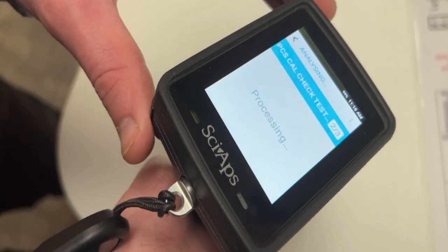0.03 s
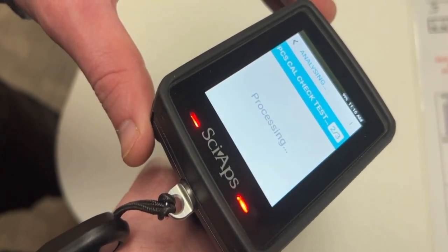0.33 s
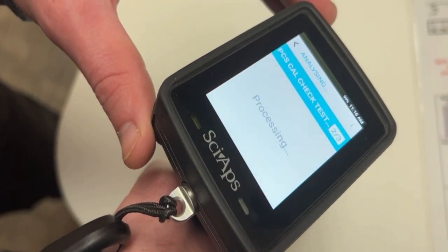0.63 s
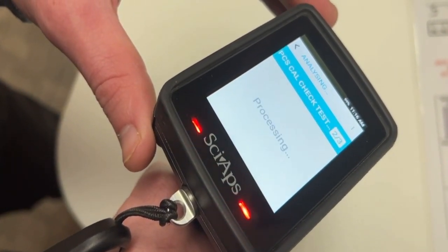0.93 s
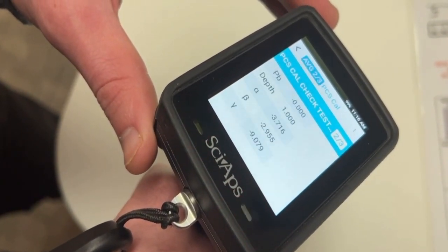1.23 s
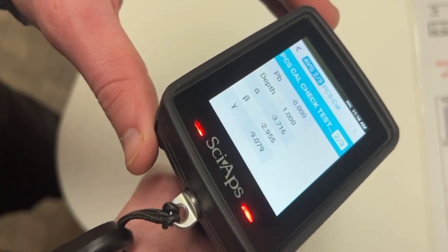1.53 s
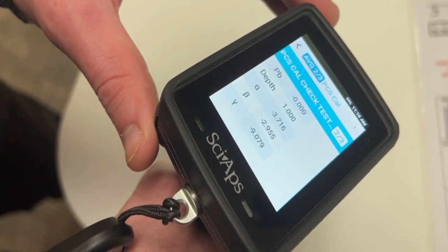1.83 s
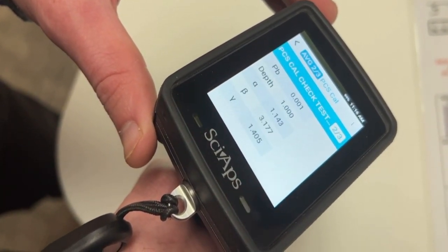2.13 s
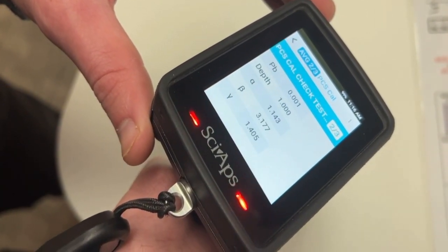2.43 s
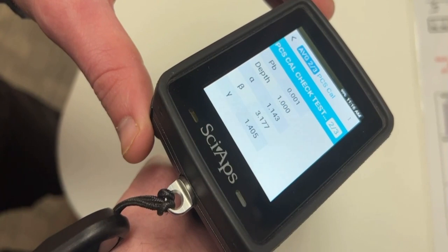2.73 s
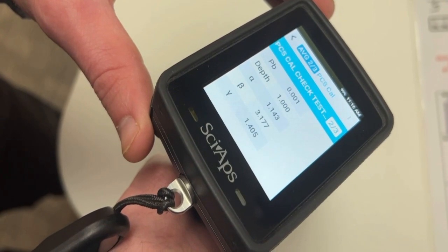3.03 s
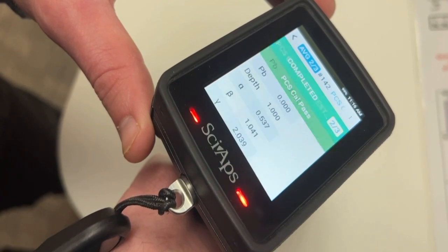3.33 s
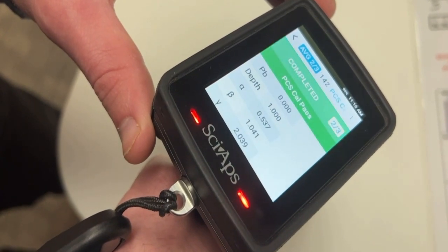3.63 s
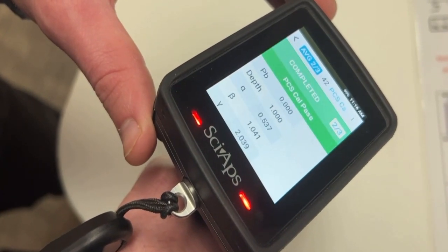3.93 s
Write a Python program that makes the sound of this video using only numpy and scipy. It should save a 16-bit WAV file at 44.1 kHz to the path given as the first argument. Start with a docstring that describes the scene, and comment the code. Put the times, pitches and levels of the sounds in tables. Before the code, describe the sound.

A handheld device's little motor gives a short, whining buzz as a latch snaps, rests with two faint ticks, then buzzes again with clicking gears and a tiny break. A low indoor hum and ventilation continue underneath.

```python
"""A click and an abrupt whirr: a small stepper motor in a handheld analyzer runs, and a latch snaps.
Two soft ticks follow, then a second burst with a brief stop in it.
The motor's steps whine; its gears rattle the plastic case and click as they take up slack.
A low hum and ventilation fill the room throughout."""
import sys
import numpy as np
from scipy import signal
from scipy.fft import rfft, irfft
from scipy.io import wavfile

SR = 44100
rng = np.random.default_rng(int(sys.argv[2]) if len(sys.argv) > 2 else 0)


def wav_out(sig):
    """Save sig, one row per channel (or a flat mono array), as 16-bit PCM at SR to the path in sys.argv[1]."""
    wavfile.write(sys.argv[1], SR, np.round(np.clip(np.atleast_2d(sig).T, -1, 1) * 32767).astype(np.int16))


N = 176400
T = np.arange(N) / SR

# Spectrum of gear clicks and latch crack. Each row: frequency in Hz, relative gain in dB.
CLICK_SPECTRUM = [(200, -15), (900, -5), (1600, 5), (2100, -9), (2600, -3.5), (3100, -4), (3800, 8),
                  (4200, -7), (4700, 8.5), (5200, -4.5), (5600, -1), (6200, -3), (6800, 4.5), (7900, -5),
                  (9700, 0.5), (12300, -3), (14000, -8), (16000, -10.5)]


def amp(db):
    return 10 ** (np.asarray(db) / 20)


def unit_rms(x):
    return x / np.sqrt(np.mean(x ** 2) + 1e-20)


def spectrum_gain(spectrum, hz):
    """Linear gain from (Hz, dB) rows, interpolated over log frequency."""
    row_hz, row_db = np.transpose(spectrum)
    return amp(np.interp(np.log(hz + 1), np.log(row_hz), row_db))


def colour(x, gain_at, size=8192):
    """Minimum-phase filter of unit energy, shaped by gain_at(hz)."""
    hz = abs(np.fft.fftfreq(size, 1 / SR))
    log_gain = np.log(gain_at(hz) + 1e-6)
    response = np.exp(np.conj(signal.hilbert(log_gain)))
    taps = np.fft.ifft(response).real[:size // 2]
    return signal.fftconvolve(x, taps / np.linalg.norm(taps))[:N]


def drift(rate_hz):
    """Low-passed random motion, unit rms."""
    hz = np.fft.rfftfreq(N, 1 / SR)
    return unit_rms(irfft(rfft(rng.standard_normal(N)) * np.exp(-(hz / rate_hz) ** 2), N))


def tone(hz):
    """Unit-rms sine along a pitch curve."""
    return np.sqrt(2) * np.sin(2 * np.pi * (np.cumsum(hz) / SR + rng.random()))


def room():
    """A swelling drone, mains hum, faint fan tones and moving air."""
    # Drone envelope. Each row: time in seconds, level in dB.
    drone_levels = [(0, -47), (.45, -57), (.65, -42.5), (1.05, -43), (1.2, -40), (1.55, -39.5), (1.65, -43),
                    (2.07, -39.5), (2.35, -49), (2.7, -47), (2.93, -52.5), (3.13, -39), (3.3, -49.5),
                    (3.57, -39.5), (3.7, -43.5), (3.9, -40.5), (4, -43)]
    # Tones of fans and electronics. Each row: frequency in Hz, level in dB.
    fan_tones = [(404, -81.5), (538, -80), (822, -83), (1087, -81), (9415, -93.5), (9512, -92)]
    # Ventilation noise. Each row: frequency in Hz, relative density in dB.
    air_spectrum = [(15, -22.5), (30, -20.5), (55, -2), (85, -4), (130, -1), (170, -1.5), (205, -9.5),
                    (260, -12.5), (330, -17.5), (380, -25.5), (530, -25), (750, -32.5), (1060, -32.5),
                    (1250, -35), (1900, -39), (2600, -42), (3600, -43.5), (5200, -48), (7500, -47.5),
                    (9500, -50), (11400, -54.5), (13400, -48.5), (16000, -53)]
    drone_hz, mains_hz, hum_wander = 94.33, 119.1, 0.0055
    mains_db, air_db, air_swell_db = -52, -47, 0.42
    drone_db = np.interp(T, *np.transpose(drone_levels))
    drone = amp(drone_db) * tone(drone_hz * (1 + hum_wander * drift(rate_hz=3.46)))
    mains = amp(mains_db) * tone(mains_hz * (1 + hum_wander * drift(rate_hz=3)))
    fans = sum(amp(db) * tone(hz * (1 + 0.002 * drift(rate_hz=30))) for hz, db in fan_tones)
    air = colour(rng.standard_normal(N), lambda hz: spectrum_gain(air_spectrum, hz))
    air *= amp(air_db + air_swell_db * drift(rate_hz=8))
    return drone + mains + fans + air


def knocks(contacts, spectrum, rise_s):
    """Each contact is a chatter of plastic parts that dies within milliseconds."""
    force = np.zeros(N)
    for start_s, db, decay_s in contacts:
        age_s = np.maximum(T - start_s, 0)
        rise = np.minimum(age_s / rise_s, 1)
        force += amp(db) * rise * np.exp(-np.maximum(age_s - rise_s, 0) / decay_s)
    chatter = force * rng.choice([-1., 1.], N)
    return colour(chatter, lambda hz: spectrum_gain(spectrum, hz))


def soft_ticks():
    """Light contacts inside the case."""
    # Each row: start in seconds, level in dB, decay in seconds.
    ticks = [(1.8043, -50, 0.004), (2.8732, -52, 0.0023)]
    # Each row: frequency in Hz, relative gain in dB.
    tick_spectrum = [(300, -20), (1100, -13), (1550, 5), (2000, 3), (2500, -14), (3400, -19), (4000, -19),
                     (5500, -23), (16000, -36)]
    return knocks(ticks, tick_spectrum, rise_s=0.0004)


def gear_clicks():
    """The gears jolt as they take up slack."""
    # Each row: start in seconds, level in dB, decay in seconds.
    jolts = [(.0040, -43, 0.0018), (.1665, -55, .002), (.3605, -53, 0.003), (3.0172, -51, .002),
             (3.5003, -50, 0.0034), (3.5072, -45.5, 0.0025)]
    return knocks(jolts, CLICK_SPECTRUM, rise_s=0.00023)


def latch():
    """A latch snaps home with a crack and rings briefly."""
    # Each row: frequency in Hz, level in dB, T60 in seconds.
    modes = [(1530, -40.5, 0.0093), (1943, -34, .014), (2650, -40.5, 0.011), (3217, -41, 0.011),
             (4080, -33, 0.0057), (4750, -40.5, .01), (6870, -57, .009), (7670, -40.5, 0.012),
             (8110, -41.5, 0.0085), (9450, -39, 0.01), (10650, -41.5, 0.013), (13900, -46.5, .008)]
    start_s, rise_s, crack_db, crack_decay_s = 0.0413, 0.0014, -39, 0.0021
    age_s = np.maximum(T - start_s, 0)
    rise = np.minimum(age_s / rise_s, 1)
    since_peak_s = np.maximum(age_s - rise_s, 0)
    ring = sum(amp(db) * np.exp(-np.log(1000) * since_peak_s / t60_s) * tone(np.full(N, hz))
               for hz, db, t60_s in modes)
    crack = knocks([(start_s, crack_db, crack_decay_s)], CLICK_SPECTRUM, rise_s)
    return rise * ring + crack


def case_gain(hz):
    """The plastic case's resonances on top of its broad radiation."""
    # Each row: centre in Hz, width in Hz, relative gain in dB.
    resonances = [(1070, 310, -15.5), (1640, 420, -5), (1832, 70, 6), (1954, 106, -0.5), (2460, 450, -5),
                  (3550, 230, -7), (3940, 130, -8.5), (4810, 160, -12), (5480, 320, -18), (6720, 210, -14),
                  (9140, 560, -12.5), (9880, 790, -11), (14300, 500, -12), (15100, 430, -14)]
    # Each row: frequency in Hz, relative gain in dB.
    broad_radiation = [(200, -13), (800, -22.5), (1400, -11.5), (3000, -14.5), (5200, -22), (7300, -18),
                       (8100, -22), (10900, -13.5), (12300, -29), (13200, -20), (16000, -20)]
    peak_power = sum(amp(db) ** 2 / (1 + 2 * ((hz - centre_hz) / width_hz) ** 2) ** 3
                     for centre_hz, width_hz, db in resonances)
    return np.sqrt(peak_power + spectrum_gain(broad_radiation, hz) ** 2)


def gear_rattle():
    """Random tooth impacts plus rubbing noise, fluttering in level."""
    impacts_per_s, spread_db, rub_share, flutter_db = 3000, 1.5, 0.56, 1.17
    teeth = rng.standard_normal(N) * amp(spread_db * rng.standard_normal(N))
    teeth *= rng.random(N) < impacts_per_s / SR
    force = np.sqrt(1 - rub_share) * unit_rms(teeth) + np.sqrt(rub_share) * rng.standard_normal(N)
    return force * amp(flutter_db * drift(rate_hz=110))


def stepper_motor():
    """Steps whine at multiples of their rate; gears shake the case, harder on starting and braking."""
    # Each row: start in seconds, end in seconds, gain in dB, direction (0 out, 1 back).
    runs = [(0.0, .371, -0.47, 0), (3.0154, 3.477, -0.5, 1), (3.499, 3.601, -1.1, 0)]
    # Whine lines, one row per direction: multiples of the step rate.
    whine_orders = [(2, 4, 5, 8, 10, 12, 14), (2, 5, 7, 9, 10, 13)]
    # One row per direction: base levels of those lines in dB.
    whine_db = [(-74, -77, -83, -80.5, -75, -74.5, -78), (-76, -76, -73, -84, -79, -75)]
    step_hz = (680.3, 675.3)  # out, back
    attack_s, release_s = 0.00048, 0.0048
    gear_db, startup_db, startup_decay_s = -56, 5, 0.03
    brake_db, brake_lead_s, brake_width_s = 3.5, 0.0053, 0.0034
    speed_jitter, load_flutter_db = 0.00118, 2
    rattle = gear_rattle()
    speed = 1 + speed_jitter * drift(rate_hz=38)
    effort, whine = np.zeros(N), np.zeros(N)
    for start_s, end_s, run_db, direction in runs:
        age_s = np.maximum(T - start_s, 0)
        release = np.exp(-np.maximum(T - end_s, 0) / release_s)
        gate = amp(run_db) * np.minimum(age_s / attack_s, 1) * release
        strain_db = startup_db * np.exp(-age_s / startup_decay_s)
        strain_db += brake_db * np.exp(-((T - end_s + brake_lead_s) / brake_width_s) ** 2)
        effort += gate * amp(strain_db)
        for order, line_db in zip(whine_orders[direction], whine_db[direction]):
            level = gate * amp(line_db + load_flutter_db * drift(rate_hz=54))
            whine += level * tone(order * step_hz[direction] * speed)
    return amp(gear_db) * colour(rattle * effort, case_gain) + whine


def scene():
    return (stepper_motor() + latch() + gear_clicks() + soft_ticks() + room())[None]


def record(dry):
    """Steep low-pass on the top treble."""
    cutoff_hz = 15800
    low_pass = signal.firwin(511, cutoff_hz, window=("kaiser", 9), fs=SR)
    return signal.oaconvolve(dry, low_pass[None], "same")


dry = scene()
out = record(dry)
wav_out(out)
```